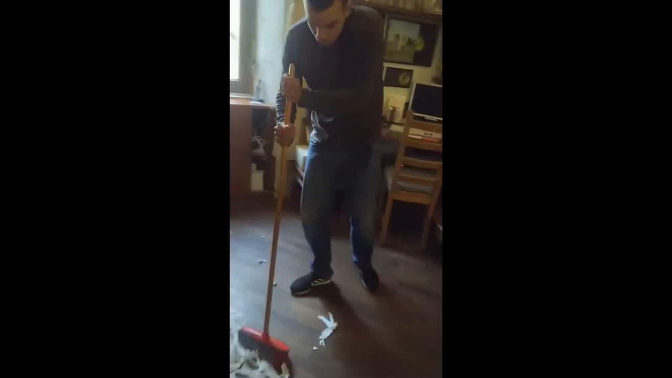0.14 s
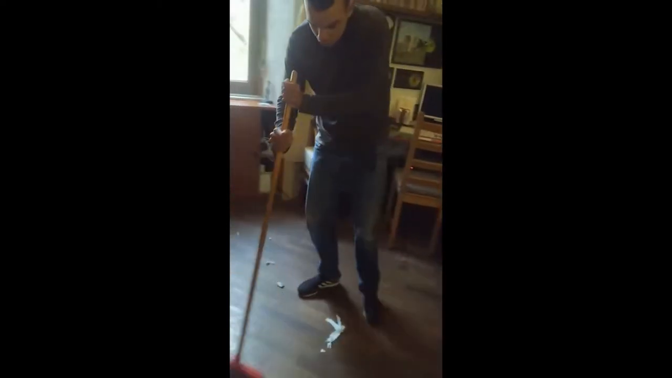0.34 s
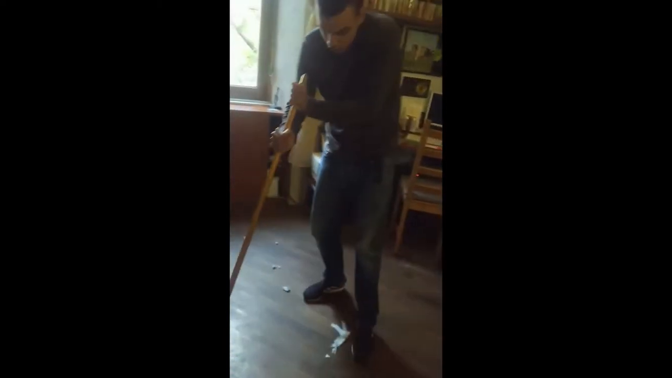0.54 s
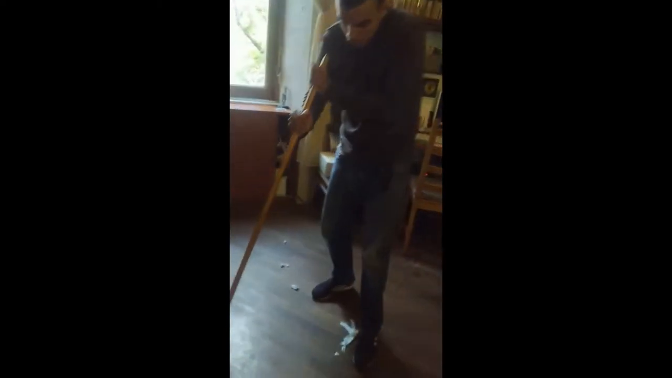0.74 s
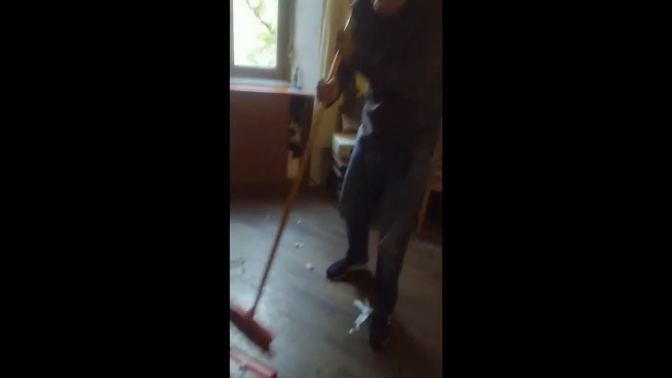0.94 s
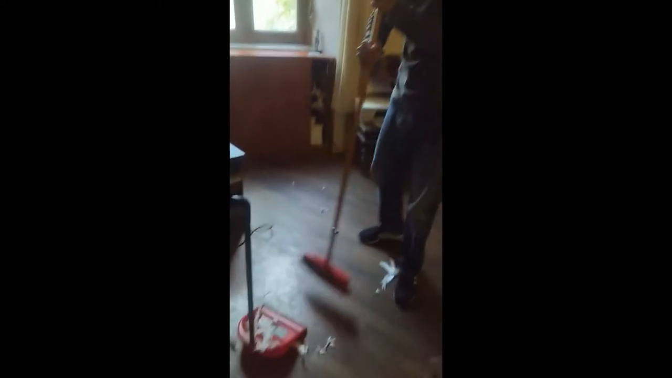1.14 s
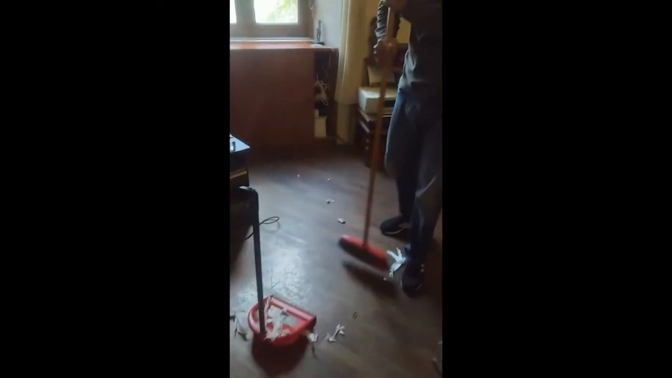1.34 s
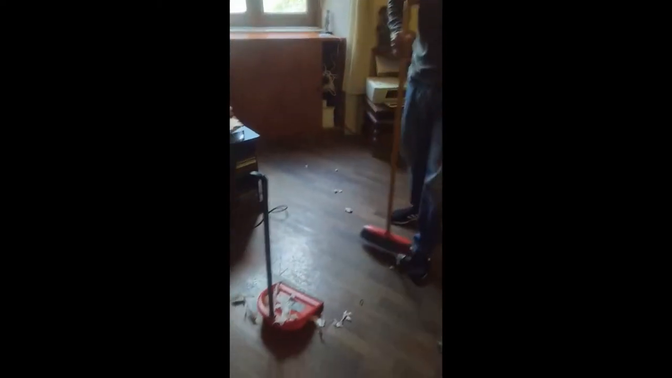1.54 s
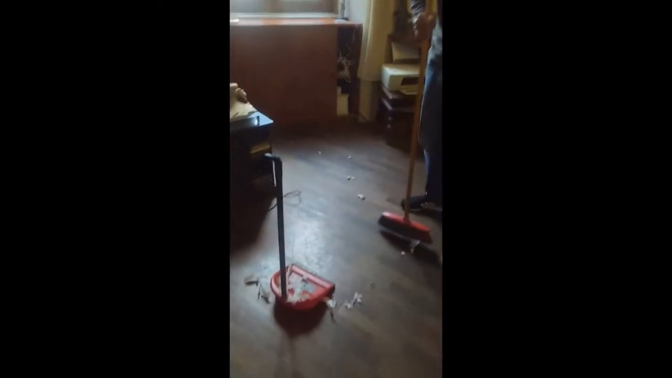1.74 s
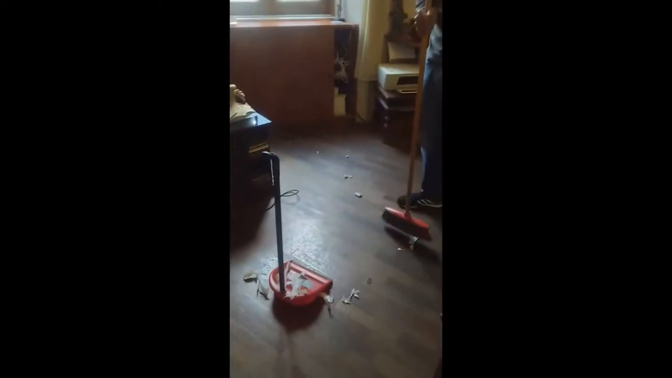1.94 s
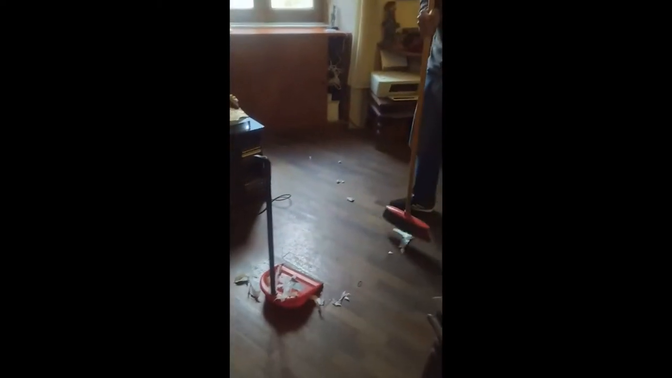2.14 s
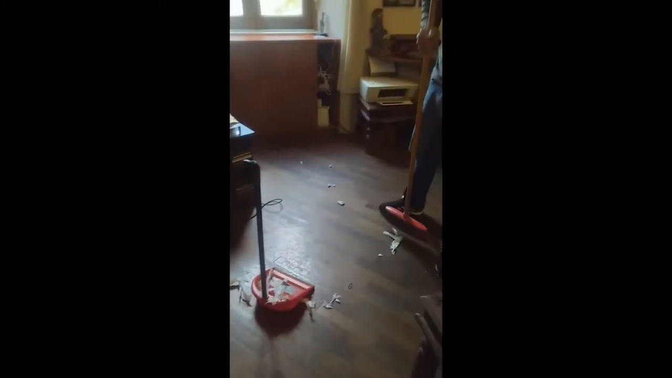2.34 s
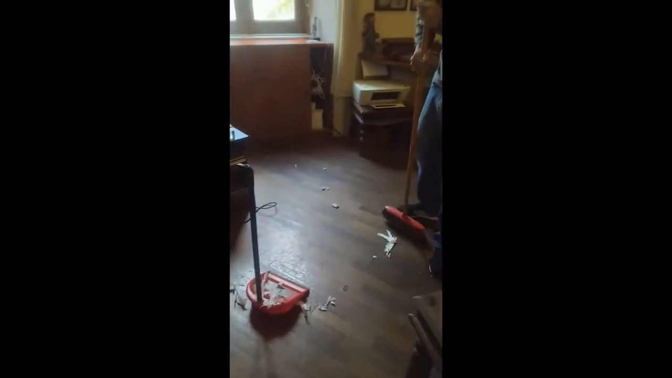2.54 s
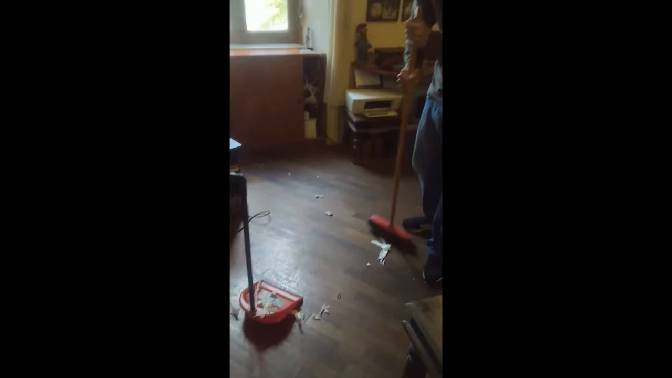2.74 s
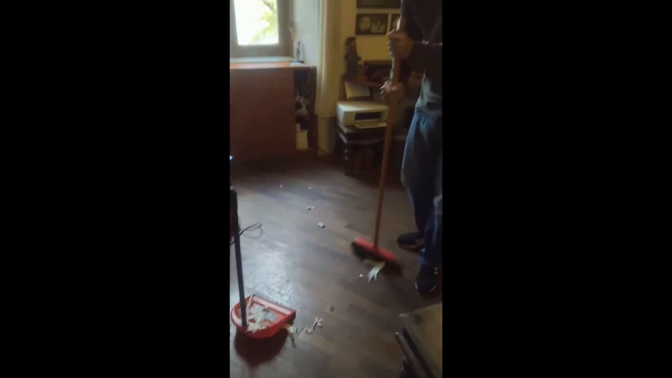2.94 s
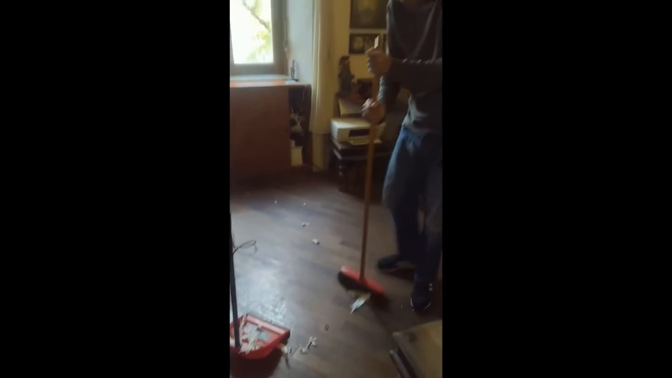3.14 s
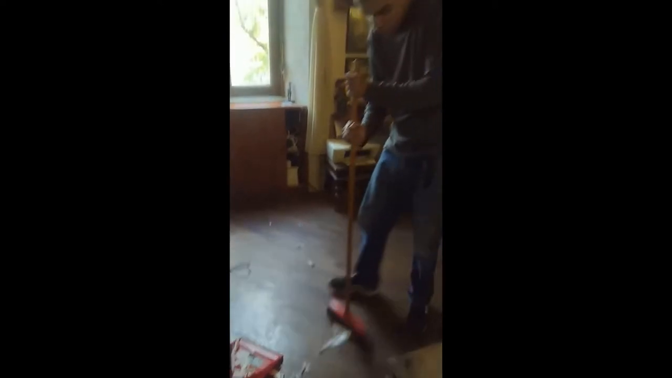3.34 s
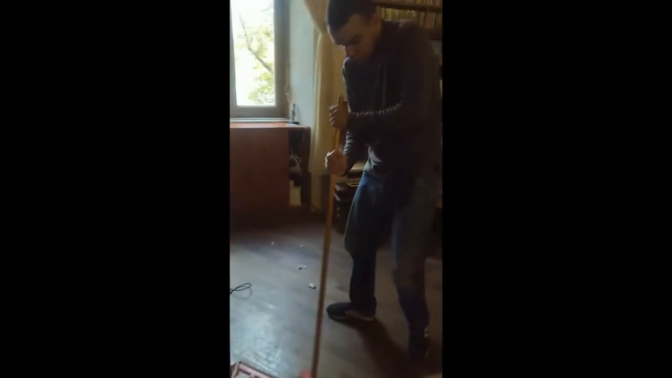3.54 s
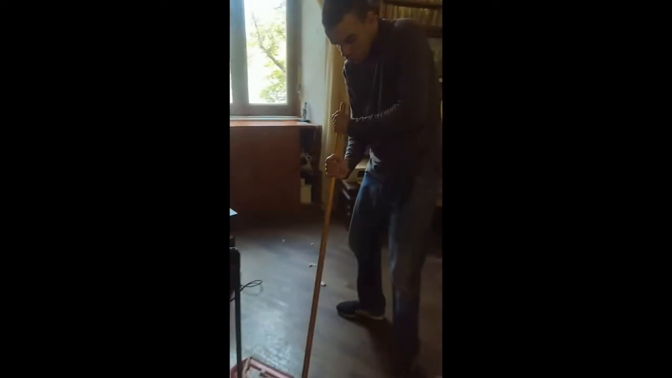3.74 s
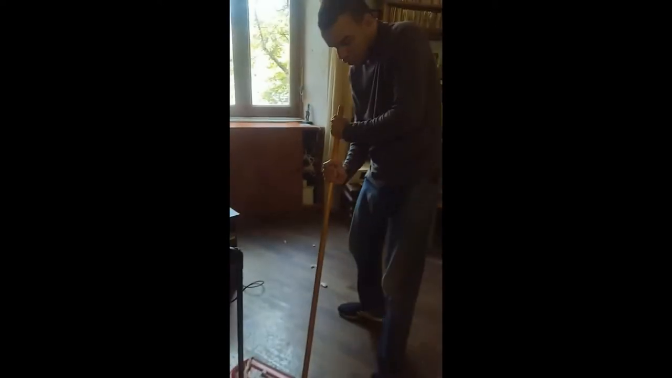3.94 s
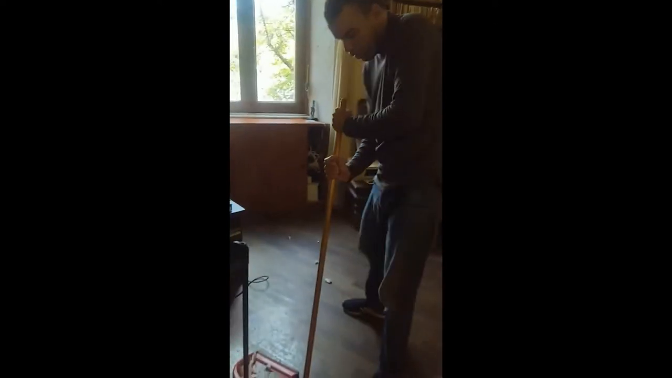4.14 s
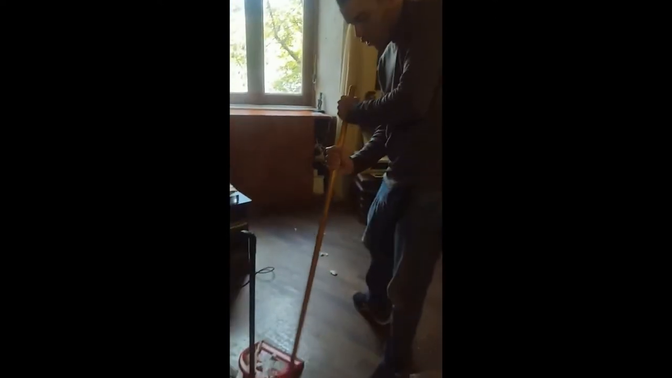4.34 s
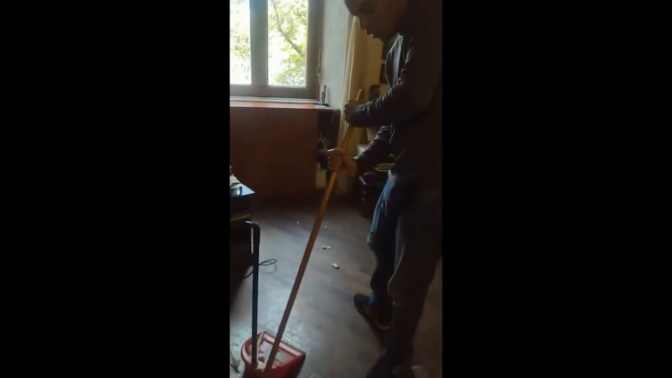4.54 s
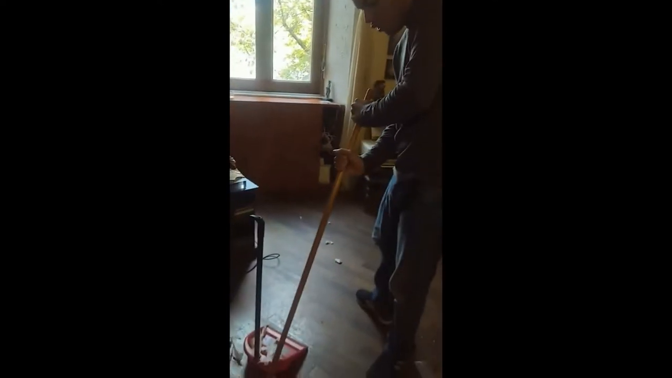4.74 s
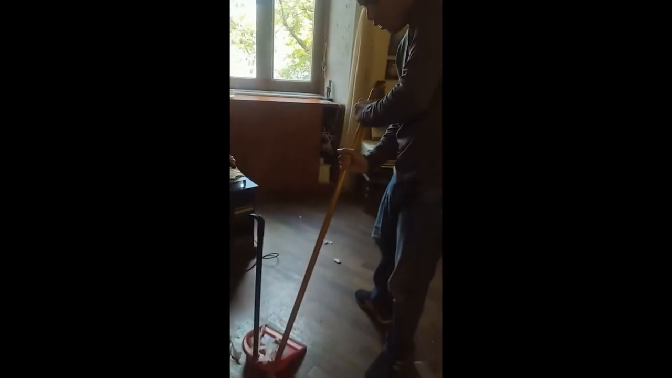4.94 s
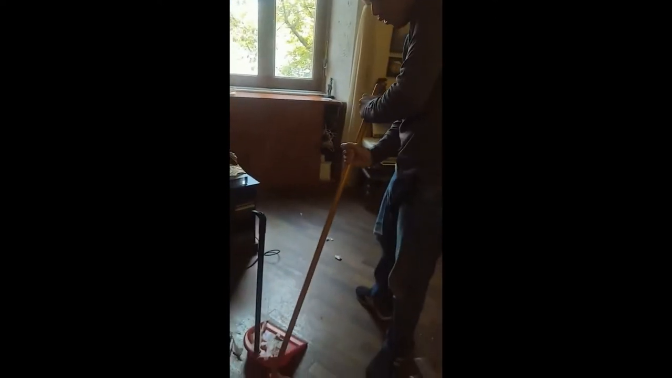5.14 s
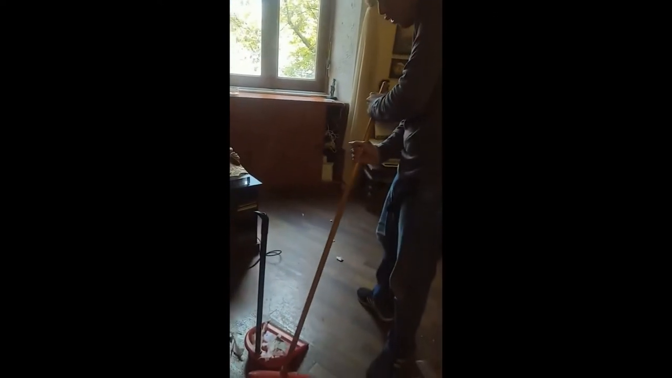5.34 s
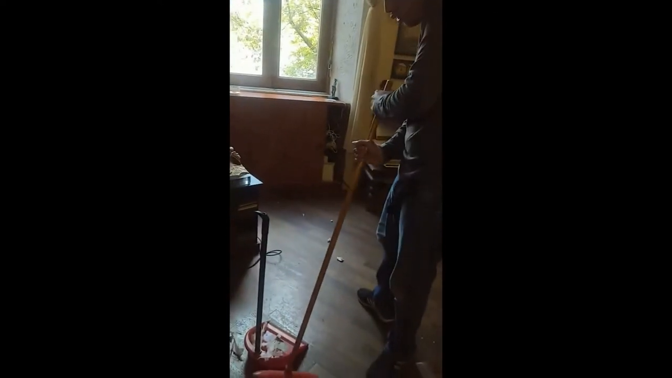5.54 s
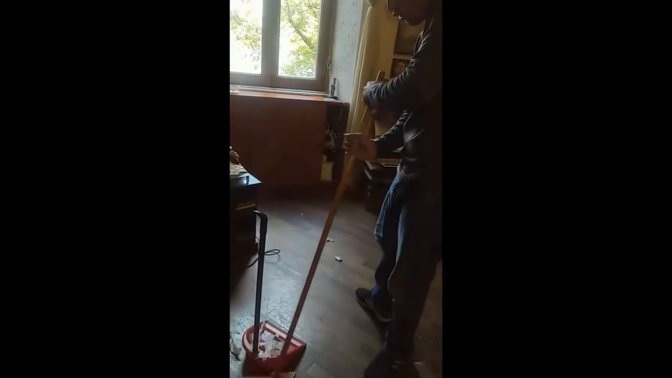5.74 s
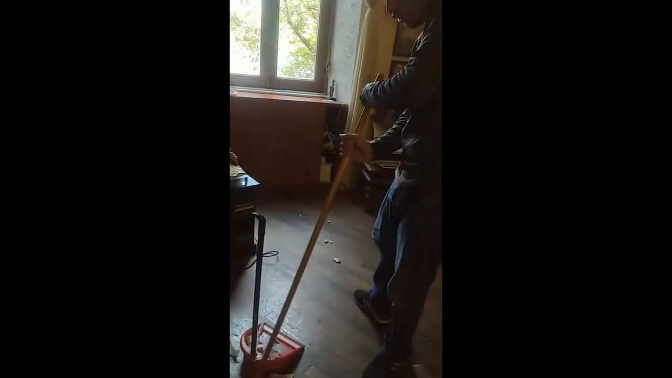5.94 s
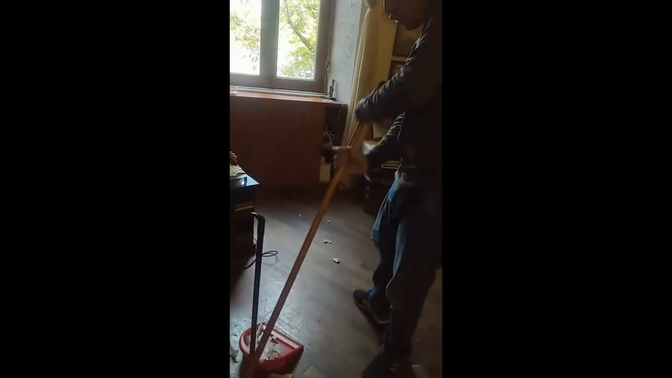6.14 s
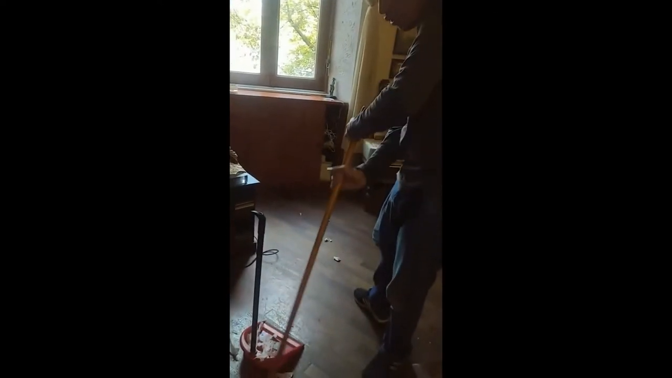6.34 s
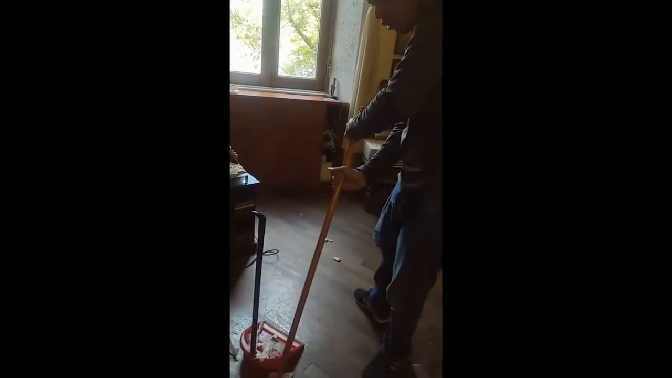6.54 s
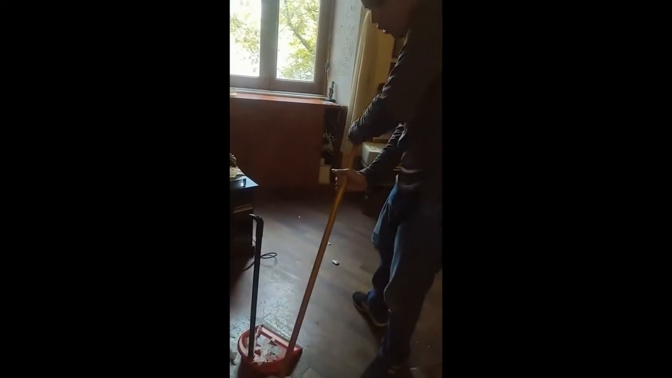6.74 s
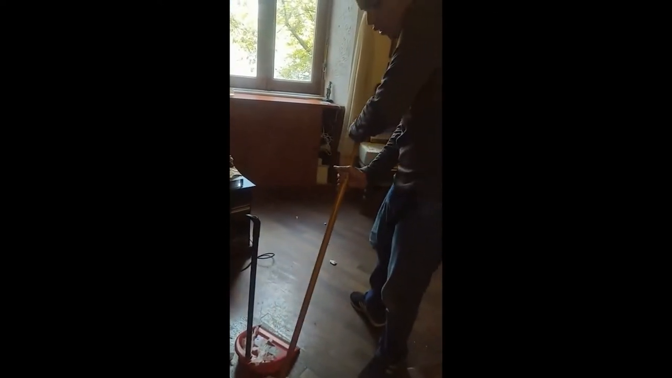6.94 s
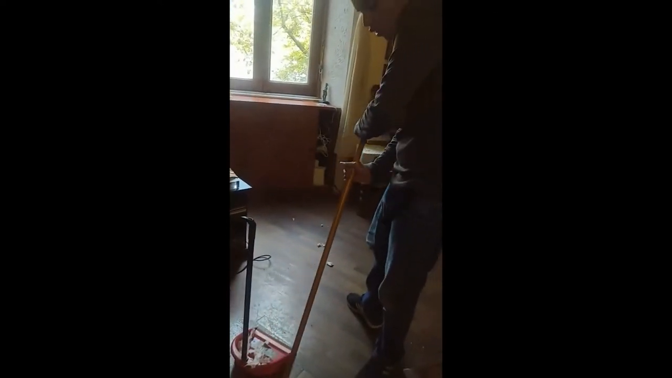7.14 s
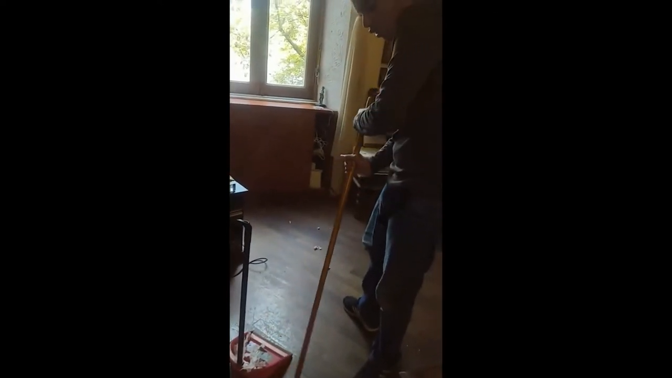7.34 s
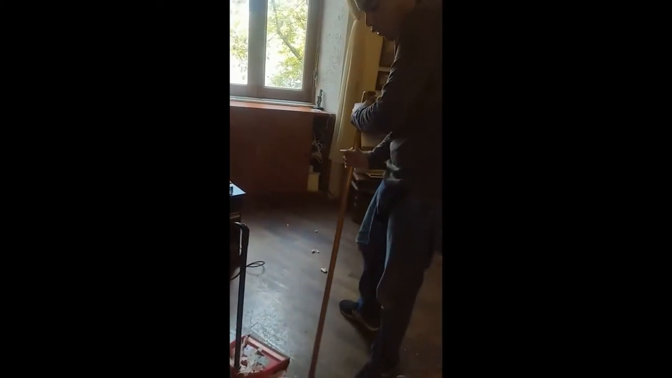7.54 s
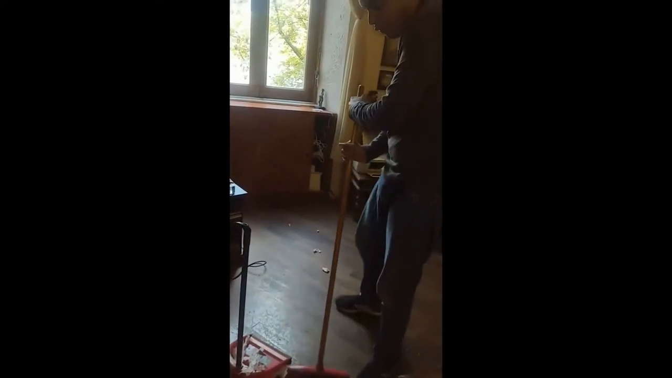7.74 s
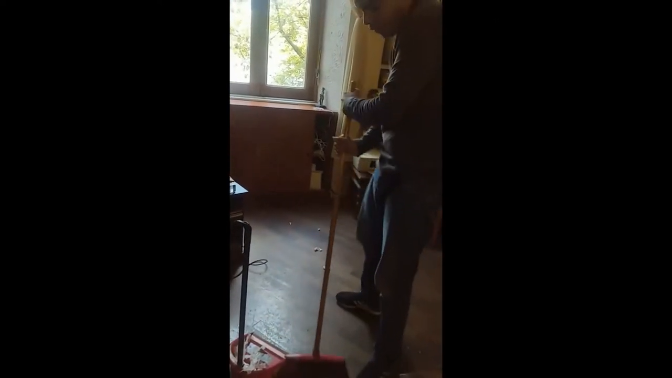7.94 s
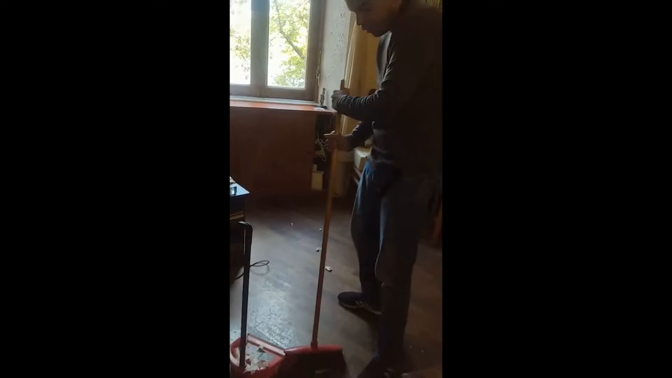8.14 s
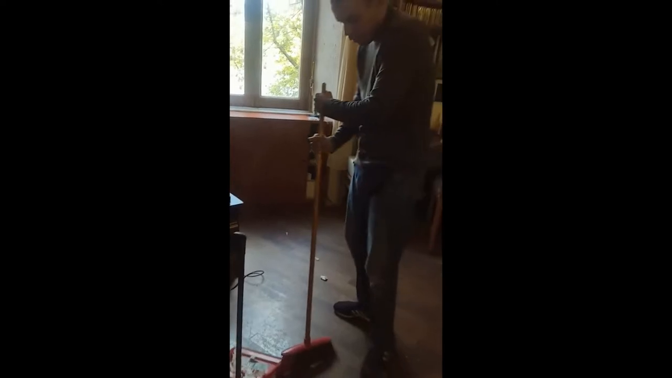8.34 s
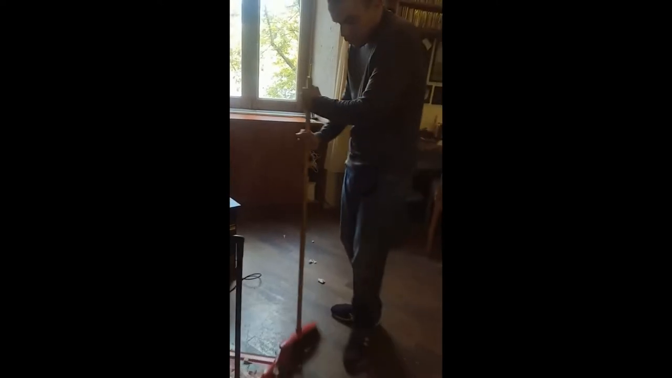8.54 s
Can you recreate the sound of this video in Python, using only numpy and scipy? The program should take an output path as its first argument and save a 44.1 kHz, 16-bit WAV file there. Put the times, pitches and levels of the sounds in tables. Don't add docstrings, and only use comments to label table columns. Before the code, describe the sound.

Close, essentially mono sound of a broom on a wooden floor in a furnished room with a short echo. A bright, grainy swish is already under way and fades by 0.6 s, followed by faint dabs and small knocks. Bristles flick sharply around 1.6 s with a light woody bump; a soft knock comes at 2.0, with a very faint sole squeak until 2.4. Another flick at 2.6 leads into the strongest stroke, 2.8 to 3.7 s, with a solid knock at 3.4. Two small knocks follow near 4.0, a crisp catch at 4.4, then a weak, pressed drag from 4.7 to 5.5. Dull thuds come at 5.7 to 5.85, a snappy flick and knock at 6.4. A long steady swish runs 6.7 to 8.0, with flicks at 7.4 and 7.6 and a low thud at 7.8; a final swish lasts to the end, about 8.6. Low traffic rumble, soft hiss, a brief faint motor drone early on and thin electronic whine stay behind.

```python
import sys
import numpy as np
from scipy import signal
from scipy.fft import rfft, irfft
from scipy.io import wavfile
from scipy.ndimage import uniform_filter1d

SR = 44100
rng = np.random.default_rng(int(sys.argv[2]) if len(sys.argv) > 2 else 0)


def waveform_to_disk(signal):
    frames = np.transpose(np.atleast_2d(signal))
    scaled = np.clip(frames, -1, 1) * 32767
    samples = np.round(scaled).astype(np.int16)
    wavfile.write(sys.argv[1], SR, samples)


def gain_from_db(level_db):
    decades = np.asarray(level_db, float) / 20
    return 10 ** decades


N = 378378
TIME = np.arange(N) / SR
COARSE = TIME[::32]

# f/Hz, level/dB (per Hz)
TIPS = [(4000, -40.5), (6500, -16), (8300, -8), (9500, -2.5), (12000, -1), (13500, -10.5), (15500, -12)]
# t/s, f/Hz
RING = [(0, 10800), (.5, 11400), (1.4, 11200), (1.65, 11300), (2.55, 10700), (3, 11250), (3.4, 11100),
        (4.3, 10400), (4.42, 10000), (5.3, 10550), (6.4, 10800), (6.8, 10700), (7.3, 10250), (7.9, 10100),
        (8.58, 11000)]
# f/Hz, level/dB (per Hz)
FINEST = [(9000, -67), (11500, -17), (13000, 2), (14500, -2.5), (16500, -2)]
# f/Hz, level/dB (per Hz)
STIFF = [(1650, -28), (2800, -11.5), (2970, -11), (3900, -8), (5690, -2), (8040, -5), (9000, -9),
         (11700, -15.5), (19800, -120)]
# f/Hz, level/dB (per Hz)
SCRAPE = [(350, -1.5), (600, -12), (1120, 3), (1210, 2), (2030, 5), (2210, 5), (3800, -0.5), (4940, -0.5),
          (8360, -120)]
FLICK_SCRAPE_DB = -5.5


def broom():
    tips_gain, finest_gain, stiff_gain, scrape_gain = contact()
    flick, catch = landing(stiff=False), landing(stiff=True)
    drive = slips(14000, 1.9, 0.35)

    tips = colour(drive, TIPS)
    ring_hz = curves(RING)[0]
    tips = patchy(tips + 0.96 * resonate(tips, ring_hz, 1100), 1.7)
    finest = patchy(colour(drive, FINEST), 1.9)
    stiff = patchy(colour(drive + 0.5 * slips(6000, 0.93, 1.2), STIFF), 2.63)
    scrape = patchy(colour(drive + 0.6 * slips(2500, 2.3, 0.71), SCRAPE), 3.25)

    swish = tips * np.hypot(tips_gain, flick)
    swish += finest * np.hypot(finest_gain, flick)
    swish += stiff * np.hypot(stiff_gain, catch)
    return swish + scrape * np.hypot(scrape_gain, gain_from_db(FLICK_SCRAPE_DB) * catch)


# t/s, level/dB of the tips (speed), level/dB of pressure
SWEEPS = [
    [(0.0, -44.5, -4), (0.122, -43, -2.5), (0.226, -53.5, -4), (0.416, -51, 1), (0.5, -46, -6),
     (0.6, -61.5, -5)],
    [(2.74, -57, 0), (2.866, -47, 3), (3.078, -39, -0.5), (3.156, -43, 3.5), (3.26, -41, 1),
     (3.3, -37.5, 1), (3.39, -36.5, -0.5), (3.49, -39, -2.5), (3.56, -38, -3.5), (3.62, -46, 1.5),
     (3.65, -52.5, 0), (3.76, -67.5, 4.5)],
    [(4.68, -58, 5), (4.684, -62.5, 2.5), (4.97, -64.5, 2), (5.15, -57.5, 3), (5.382, -55, 2.5),
     (5.46, -57.5, 3), (5.534, -67, -2), (5.55, -66, 2)],
    [(6.69, -64, 4), (6.742, -54, 1.5), (6.822, -51, 1.5), (6.946, -56, 2), (7.314, -45.5, 0.5),
     (7.52, -46, 1.5), (7.64, -45, 2.5), (7.75, -47, 0), (8.012, -51, 0), (8.05, -58, -2)],
    [(8.05, -57.5, 2), (8.194, -50, -0.5), (8.26, -51.5, 0), (8.566, -49, 2.5), (8.57, -47, 2)],
]
LITTER_DB = [-43.5, -48.5, -51.5, -53, -44]
# t/s, hold/s, level/dB of tips, level/dB of pressure, level/dB of finest tips
DABS = [(0.604, 0.14, -64, -5, -1), (0.827, 0.13, -65.5, -7.5, 0), (1.043, .1, -68.5, -8, -8),
        (1.356, .01, -54, -10, 0), (1.536, .03, -68, -9, -2), (1.61, .03, -50, -11.5, -4),
        (1.653, 0.013, -48, -11, -1), (1.746, 0.16, -68.5, -6, -5), (2.03, 0.23, -76, 1.5, 5),
        (2.296, 0.15, -68.5, -6.5, -10), (2.509, 0.076, -52.5, -12, -8), (2.603, 0.09, -53, -7.5, 1),
        (3.82, .2, -67, -5.5, 3), (4.084, 0.33, -67, -6, -3), (4.403, 0.019, -41.5, -11, -13),
        (4.517, 0.24, -68.5, -2, -2), (5.632, 0.028, -55.5, -6.5, 0), (6.112, .1, -71.5, -7, -2),
        (6.25, .01, -63.5, -11, -10), (6.387, 0.03, -46.5, -3.5, 0), (6.45, 0.027, -50, -10.5, 2),
        (6.55, 0.048, -63.5, -6.5, -9)]
LAND_DB_PER_S, LIFT_DB_PER_S = 351, 172
STIFF_DB, FINEST_DB, FINEST_PER_PRESSURE = -8.5, -0.5, 0.45
SCRAPE_PER_SPEED = 0.43
DAB_SCRAPE_DB = -6


def contact():
    power = np.zeros((4, len(COARSE)))
    for rows, litter_db in zip(SWEEPS, LITTER_DB):
        speed_db, press_db = np.array(curves(rows))[:, ::32]
        start, end = rows[0][0], rows[-1][0]
        ends_db = plateau(start, end - start, LAND_DB_PER_S, LIFT_DB_PER_S)
        finest_db = speed_db + FINEST_DB + FINEST_PER_PRESSURE * press_db
        stiff_db = speed_db + STIFF_DB + press_db
        scrape_db = litter_db + SCRAPE_PER_SPEED * speed_db
        power += gain_from_db(2 * (np.array([speed_db, finest_db, stiff_db, scrape_db]) + ends_db))
    for s, hold, db, press_db, finest_db in DABS:
        shape = gain_from_db(2 * (db + plateau(s, hold, LAND_DB_PER_S, LIFT_DB_PER_S)))
        layers_db = np.array([[0], [finest_db], [press_db], [press_db + DAB_SCRAPE_DB]])
        power += gain_from_db(2 * layers_db) * shape
    return [fine(layer) for layer in np.sqrt(power)]


# t/s, level/dB of tips, level/dB of stiff ones (above tips), t60/s
FLICKS = [(1.3064, -55, -10, 0.15), (1.3299, -49, -19, 0.15), (1.4506, -48.5, -15, 0.15),
          (1.5928, -32.5, -12.5, 0.14), (1.627, -34, -8, 0.13), (1.84, -50, -20, 0.15),
          (2.0004, -57, -1, 0.15), (2.421, -49.5, -2, 0.15), (2.4823, -52, -23, 0.17),
          (2.6249, -36, -6, 0.13), (3.908, -53, 7.5, 0.2), (4.009, -61, -3, 0.17), (4.6294, -48, -6, 0.19),
          (5.1542, -43, -8, 0.13), (6.347, -51, -19, 0.13), (6.3684, -31.5, -9, 0.17),
          (6.3994, -43, -15, 0.12), (7.424, -33, -20, 0.12), (8.468, -42, -4, .2),
          (7.608, -28.5, -19, 0.15)]


def landing(stiff):
    out, age = np.zeros(N + SR), np.arange(SR // 2) / SR
    for s, db, stiff_db, t60 in FLICKS:
        onset = np.minimum(age / 0.0014, 1)
        fading_db = db - 11.0 + stiff * stiff_db - 60 * age / t60
        out[round(s * SR):][:len(age)] += gain_from_db(fading_db) * onset
    return out[:N]


def slips(per_s, spread_db, clump_db):
    size = gain_from_db(spread_db * np.minimum(rng.exponential(1, N), 5)) * rng.choice([-1., 1.], N)
    clumps = evened(uniform_filter1d(rng.standard_normal(N), size=160))
    happens = rng.random(N) < per_s / SR
    return evened(size * happens * gain_from_db(clump_db * clumps))


def patchy(x, depth_db):
    z = signal.stft(x, nperseg=512)[2]
    patches = uniform_filter1d(rng.standard_normal(z.shape), size=4, axis=0)
    patches = evened(uniform_filter1d(patches, size=6, axis=1))
    return evened(signal.istft(z * gain_from_db(depth_db * patches), nperseg=512)[1][:N])


# t/s, length/s, f/Hz, level/dB
SCUFFS = [(2.62, 0.089, 1870, -56.5), (4.01, 0.066, 1200, -59.5), (4.35, 0.15, 1460, -61.5),
          (4.4, 0.14, 3600, -56.5), (7.97, 0.097, 850, -64), (8.27, 0.18, 1000, -65),
          (8.47, 0.07, 1100, -60), (7.8, 0.11, 145, -60.5), (3.92, .09, 5500, -60.5),
          (.72, 0.089, 800, -66), (.3, 0.27, 810, -68.5), (2.97, 0.24, 2100, -61.5),
          (4.63, 0.05, 1030, -64), (6.375, .09, 320, -67), (6.375, 0.061, 1200, -62),
          (6.7, 0.42, 8000, -63), (.42, 0.14, 8200, -57), (6.4, 0.16, 7800, -55.5),
          (2.625, .05, 2400, -58.5), (7.7, 0.042, 800, -70), (7.79, 0.073, 1200, -64),
          (7.93, 0.053, 370, -64), (3.42, 0.085, 470, -60), (8.48, 0.043, 780, -63), (4.42, .1, 5500, -54),
          (3.54, 0.083, 6000, -54), (4.35, 0.077, 8500, -59), (7.33, .07, 5200, -59),
          (7.435, .04, 4300, -60), (7.6, .08, 4200, -59), (7.76, .06, 4800, -61), (8.36, .025, 3000, -63),
          (7.1, .06, 4500, -64), (.47, .1, 8800, -56), (3.4, .06, 2600, -57), (7.3, .3, 2300, -66)]
SCUFF_RISE, SCUFF_WIDTH = 0.18, 0.5


def scuffs():
    out, drive = np.zeros(N + SR), slips(3000, 2.7, 1.3)
    for s, length, hz, db in SCUFFS:
        u = np.arange(0, 1.6, 1 / (length * SR))
        shape = np.minimum(u / SCUFF_RISE, 1) * gain_from_db(-14 * u ** 2)
        grains = drive[round(s * SR) // 2:][:len(u)]
        grains = resonate(resonate(grains, hz, SCUFF_WIDTH * hz), hz, 2 * hz)
        out[round(s * SR):][:len(u)] += gain_from_db(db) * shape * evened(grains)
    return out[:N]


# t/s, level/dB, f/Hz
SQUEAK = [
    (1.92, -95, 3700),
    (1.96, -80, 3650),
    (2.05, -82, 3680),
    (2.13, -77, 3660),
    (2.2, -79, 3730),
    (2.3, -81, 3750),
    (2.42, -92, 3750),
]


def squeak():
    level_db, hz = curves(SQUEAK)
    whistle = resonate(resonate(slips(9000, 1, 1.2), hz, 260), hz, 700)
    return gain_from_db(level_db + 7.5) * evened(whistle)


# t/s, peak level/dB, f/Hz of the spot hit, level/dB of the boards, level/dB of the tick (above the spot)
KNOCKS = [(.691, -63.5, 1800, -2, 16), (0.791, -62, 430, -2, -14), (1.584, -53.5, 523, 2.5, -20),
          (2.001, -58, 1900, -3, 5), (2.153, -66, 420, -16, -20), (2.639, -58, 810, -25, -10),
          (3.394, -53, 700, 3, 9), (3.907, -59, 600, 0, 2), (4.007, -55, 600, 0, 8),
          (4.628, -57, 1250, -6, -4), (5.719, -55, 244, -15, -20), (5.848, -60, 207, -19, -22),
          (6.372, -49.5, 1200, -5, 3.5), (7.786, -55, 185, -1.5, -4)]
# f/Hz, width/Hz, level/dB
BOARDS = [(225, 42, 1.5), (288, 104, 1.5), (390, 94, 0.5), (506, 130, 1), (672, 210, -2), (890, 500, -7),
          (1135, 69, -6), (1660, 550, -12)]
KNOCK_T60_S, LONGER_PER_DB = 0.1, 0.025


def knocks():
    out, t = np.zeros(N + SR), np.arange(SR // 6) / SR
    for s, db, hz, boards_db, tick_db in KNOCKS:
        noise = rng.standard_normal(len(t))
        t60 = KNOCK_T60_S * (1 + LONGER_PER_DB * (db + 54))
        blow = gain_from_db(-60 * (t / t60) ** 1.02) * np.minimum(t / 0.0023, 1)
        spot = blow * rattle(noise[::-1], hz, 0.35 * hz)
        boards = np.zeros(len(t))
        for k, (f, width, mode_db) in enumerate(BOARDS):
            boards += (-1) ** k * gain_from_db(mode_db) * rattle(noise, f, width)
        boards *= blow
        tick = resonate(noise * gain_from_db(-60 * t / 0.05), 1900, 2400)
        for part, part_db in (spot, 0), (boards, boards_db), (tick, tick_db):
            out[round(s * SR):][:len(t)] += gain_from_db(db + part_db - 0.5) * part / abs(part).max()
    return out[:N]


def rattle(noise, hz, width):
    ring = resonate(resonate(noise, hz, width), hz, 2 * width)
    return ring / np.sqrt(uniform_filter1d(ring ** 2, size=300) + 1e-12)


# t/s, f/Hz, level/dB, t60/s
STRUCK = [(.789, 450, -58, .12), (.789, 205, -60, .1), (.789, 870, -64, .08), (.802, 360, -59, .12),
          (1.5845, 560, -50, .03), (1.5845, 170, -51, .05), (1.5845, 1050, -58, .03),
          (1.594, 501, -53, 0.11), (1.612, 240, -55, .1), (2.0, 1430, -57, .06), (2.005, 220, -55, .05),
          (2.006, 800, -61, .04), (2.015, 1200, -61, .05), (2.02, 300, -57, .05), (2.03, 200, -57, .06),
          (2.153, 460, -54, .05), (3.3945, 222, -43, .09), (3.3945, 490, -42.5, .06),
          (3.3945, 917, -42, .05), (3.3945, 1190, -50, .08), (3.4115, 720, -41.5, .045),
          (3.415, 620, -50, .1), (3.415, 810, -51, .09), (3.411, 390, -50, .13), (3.428, 700, -47, .06),
          (3.445, 604, -51, .12), (4.0065, 510, -47, .09), (4.0065, 1800, -58, .03),
          (4.0124, 460, -49, .04), (4.013, 1250, -54, .04), (4.008, 2500, -58, .05), (4.022, 600, -51, .07),
          (4.024, 370, -49, .07), (4.024, 1850, -59, .05), (7.787, 165, -47, .07), (7.787, 450, -59, .05),
          (7.798, 230, -55, .09), (7.81, 370, -60, .08), (7.816, 620, -61, .07)]
CONTACT_S = 0.0012


def struck():
    out, t = np.zeros(N + SR), np.arange(SR // 5) / SR
    for s, hz, db, t60 in STRUCK:
        shape = gain_from_db(db - 60 * t / t60) * np.minimum(t / CONTACT_S, 1)
        out[round(s * SR):][:len(t)] -= shape * np.sin(2 * np.pi * hz * t)
    return out[:N]


# f/Hz, t60/s
ROOM = [(150, 0.29), (600, 0.3), (2500, 0.2), (8000, 0.092), (15000, 0.066)]


def room(x):
    out = np.zeros(N)
    for turn in np.arange(3) / 3:
        taps = np.zeros(SR // 2)
        at = np.arange(200, len(taps) - 20, 20)
        taps[at + rng.integers(0, 20, len(at))] = rng.choice([-1., 1.], len(at))
        hz, t, z = signal.stft(taps, SR, nperseg=256)
        decay = gain_from_db(-60 * t / read(ROOM, hz)[:, None])
        tail = signal.istft(z * decay, SR, nperseg=256)[1]
        share = np.sqrt(2 / 3) * np.cos(np.pi * (1.3 * TIME + turn))
        out += signal.fftconvolve(x * share, tail / np.linalg.norm(tail))[:N]
    return out


# f/Hz, width/Hz
MODES_HZ = [(50, 11), (80, 24), (122, 52), (212, 47), (320, 157)]
RUMBLE_DB = [-70, -71, -72.5, -79, -84.5]


def rumble():
    return sum(traffic(hz, db) * room_mode(hz, width) for db, (hz, width) in zip(RUMBLE_DB, MODES_HZ))


# t/s, length/s, f/Hz, level/dB
PASSES = [(0.047, 0.45, 85.5, -66), (0.667, 0.34, 50, -63), (1.5, .5, 70, -70), (2.38, 0.39, 50, -71),
          (2.9, 0.12, 70, -67), (3.48, 0.082, 51.3, -53.5), (4.15, 0.23, 52, -62.5), (4.1, 0.35, 153, -66),
          (4.76, 0.38, 60, -58), (5.343, 0.27, 50, -61), (5.184, .15, 212, -68.5), (5.6, 0.28, 159, -64),
          (6.2, 1, 50, -64), (6.884, 0.35, 115, -68.5), (7.24, 0.35, 79.5, -60.5),
          (7.733, 0.17, 64.5, -58.5), (7.955, 0.17, 50, -62), (8.1, 0.1, 80, -70), (8.55, 0.18, 122, -71.5),
          (.04, 0.35, 310, -69), (4.8, 0.28, 310, -72), (5.95, 0.12, 300, -75), (0.818, 0.11, 140, -64),
          (4.05, 0.085, 247, -72), (3.15, .1, 101, -72), (6.85, .2, 200, -74)]
WANDER_DB = 2


def traffic(mode_hz, rest_db):
    wander = uniform_filter1d(rng.standard_normal(len(COARSE)), size=190)
    wander = evened(uniform_filter1d(wander, size=190))
    power = gain_from_db(2 * (rest_db + WANDER_DB * wander))
    for s, length, hz, db in PASSES:
        off_pitch_db = 22 * np.log(hz / mode_hz) ** 2 / 0.22
        off_time_db = 17.4 * ((COARSE - s) / length) ** 2
        power = power + gain_from_db(2 * (db - off_pitch_db - off_time_db))
    return fine(np.sqrt(power))


def room_mode(hz, width):
    ring = resonate(resonate(rng.standard_normal(N), hz, width), hz, 1.16 * width)
    return ring / np.sqrt(uniform_filter1d(ring ** 2, size=9000) + 1e-12)


HUM_HZ, HUM_DB, HUM_FROM_S, HUM_S = 460, -79.5, 0.23, 0.52


def drone():
    tone = evened(resonate(resonate(rng.standard_normal(N), HUM_HZ, 14), HUM_HZ, 25))
    return fine(gain_from_db(HUM_DB + plateau(HUM_FROM_S, HUM_S, 100, 150))) * tone


# start t/s, end t/s, level/dB
WHINE_SPELLS = [
    (0, .9, -77),
    (2.1, 2.5, -72),
    (3, 4.2, -80),
    (5.72, 6.33, -73),
]
WHINE_HZ, WHINE_DB = 11240, -80


def whine():
    gain = gain_from_db(WHINE_DB)
    for start, end, db in WHINE_SPELLS:
        gain = gain + 0.6 * gain_from_db(db + plateau(start, end - start, 60, 60))
    return fine(gain) * np.sin(2 * np.pi * WHINE_HZ * TIME)


# f/Hz, level/dB (per Hz)
HUSH = [(88, -15), (150, -1), (530, -7), (813, -8.5), (1510, -11), (2110, -10), (3560, -16.5), (7310, -17),
        (9600, -16), (11200, -10.5), (14700, -14), (15600, -26)]
HUSH_DB = -63.5


def hiss():
    return gain_from_db(HUSH_DB - 2.0) * patchy(colour(rng.standard_normal(N), HUSH[:-1]), 1.3)


def evened(x):
    return x / np.sqrt(np.mean(x ** 2) + 1e-20)


def read(points, hz):
    f, value = np.transpose(points)
    return np.interp(np.log(hz + 1), np.log(f + 1), value)


def curves(rows):
    s, *columns = np.transpose(rows)
    return [np.interp(TIME, s, c) for c in columns]


def fine(gain):
    return np.interp(TIME, COARSE, gain)


def plateau(start, hold, rise, fall):
    return -rise * np.maximum(start - COARSE, 0) - fall * np.maximum(COARSE - start - hold, 0)


def colour(x, spectrum):
    gain = gain_from_db(read(spectrum, np.fft.rfftfreq(len(x), 1 / SR)))
    return evened(irfft(rfft(x) * gain, len(x)))


def resonate(x, hz, width):
    r = np.exp(-np.pi * width / SR)
    if np.ndim(hz) == 0:
        return 2 * signal.lfilter([1 - r], [1, -r * np.exp(2j * np.pi * hz / SR)], x + 1e-18).real
    turn = np.exp(2j * np.pi * np.cumsum(hz * np.ones(len(x))) / SR)
    return 2 * (turn * signal.lfilter([1 - r], [1, -r], x / turn + 1e-18)).real


def scene():
    swish, hits, rings = broom() + squeak() + scuffs(), knocks(), struck()
    wet = room(gain_from_db(-14.0) * swish + gain_from_db(-7.5) * hits + gain_from_db(-15) * rings)
    background = rumble() + drone() + whine() + hiss()
    mono = gain_from_db(-2.5) * swish + hits + rings + wet + background
    return np.array([mono, mono])


def starved(x, below_db):
    hz, _, z = signal.stft(x, SR, nperseg=1024, noverlap=768)
    near = uniform_filter1d(uniform_filter1d(abs(z) ** 2, size=3, axis=1), size=7, axis=2)
    around = uniform_filter1d(near, size=24, axis=1)
    dropped = (near < around * gain_from_db(-2 * below_db)) & (hz[:, None] > 5000)
    return signal.istft(z * np.where(dropped, 0.15, 1), SR, nperseg=1024, noverlap=768)[1][:, :N]


REFILL_EVERY_S, REFILL_WIDTH = 0.22, 1.15


def split_bands(mono):
    side, window = np.zeros(N), np.sin(np.pi * np.arange(2048) / 2048)
    half = len(window) // 2
    hz = np.fft.rfftfreq(len(window), 1 / SR)
    for start in np.arange(0.05, N / SR - 0.4, REFILL_EVERY_S):
        late, place = rng.random(2)
        middle = round((start + late * REFILL_EVERY_S) * SR)
        low = 4700 + 9800 * place ** 0.7
        span = slice(middle - half, middle + half)
        band = abs(rfft(mono[span] * window)) * (hz > low) * (hz < low * REFILL_WIDTH)
        side[span] += window * irfft(band * np.exp(2j * np.pi * rng.random(len(hz))))
    return np.array([side, -side])


def top_cut(x):
    return signal.sosfilt(signal.butter(12, 16790, fs=SR, output="sos"), x)


EDGE_HZ = 15780


def record(dry):
    dry = signal.sosfilt(signal.butter(3, 34, "high", fs=SR, output="sos"), dry)
    dry = starved(dry, 4.4)
    low_pass = signal.firwin(1023, EDGE_HZ, window=("kaiser", 9), fs=SR)
    dry = signal.oaconvolve(dry, low_pass[None], "same")
    return top_cut(dry + split_bands(dry[0]))


dry = scene()
out = record(dry)
waveform_to_disk(out)
```